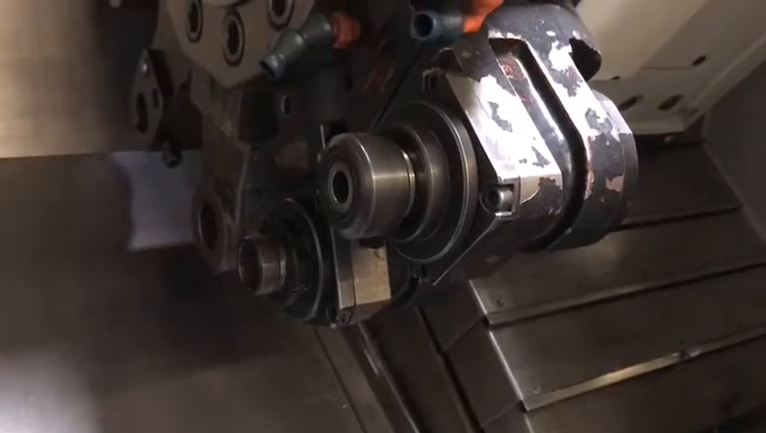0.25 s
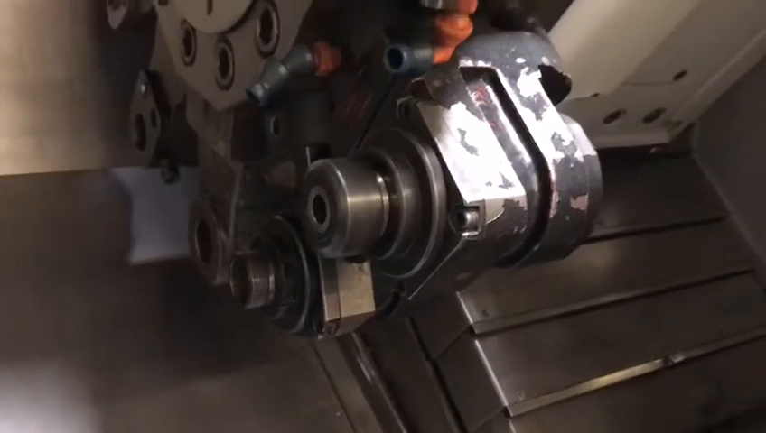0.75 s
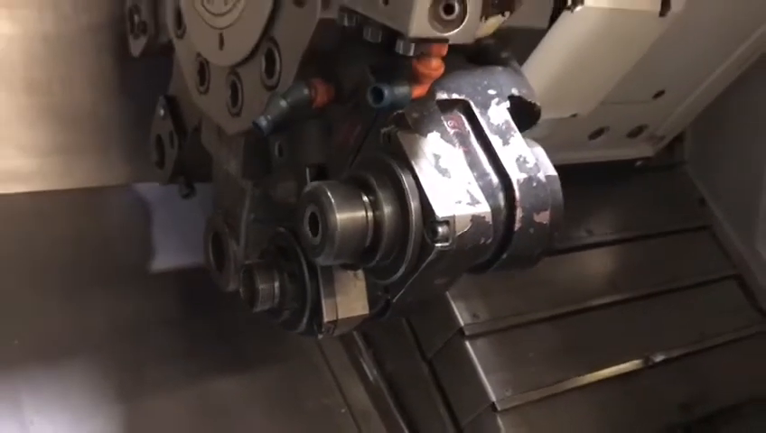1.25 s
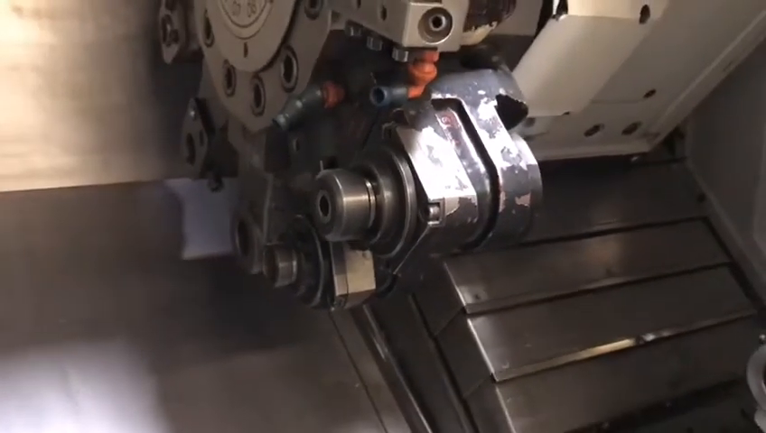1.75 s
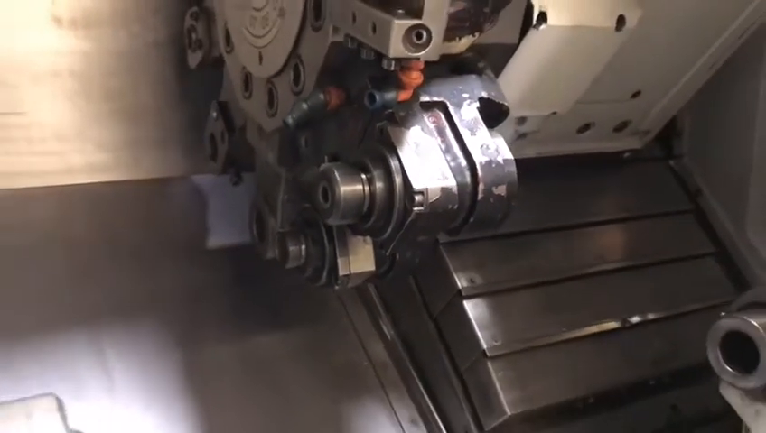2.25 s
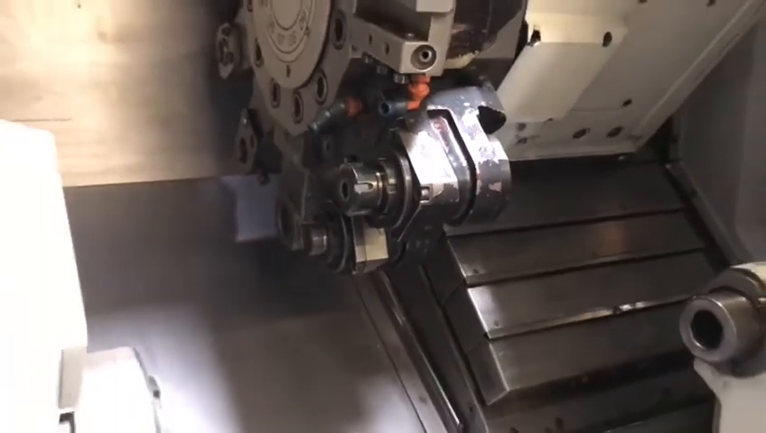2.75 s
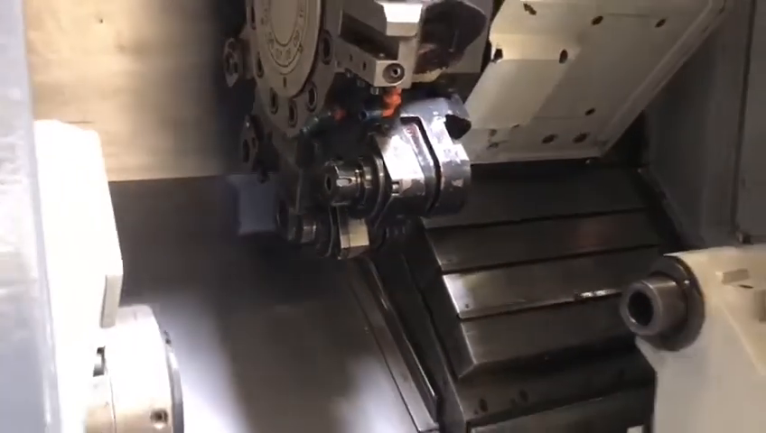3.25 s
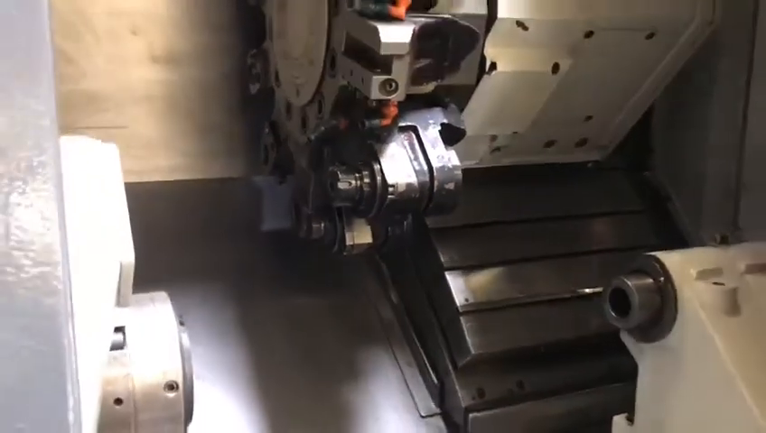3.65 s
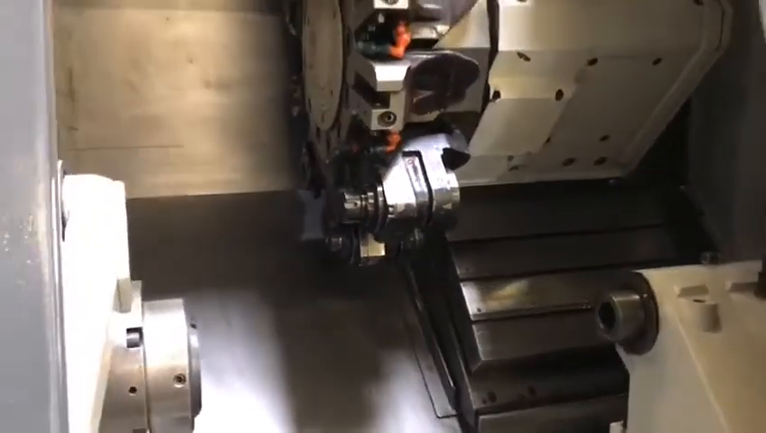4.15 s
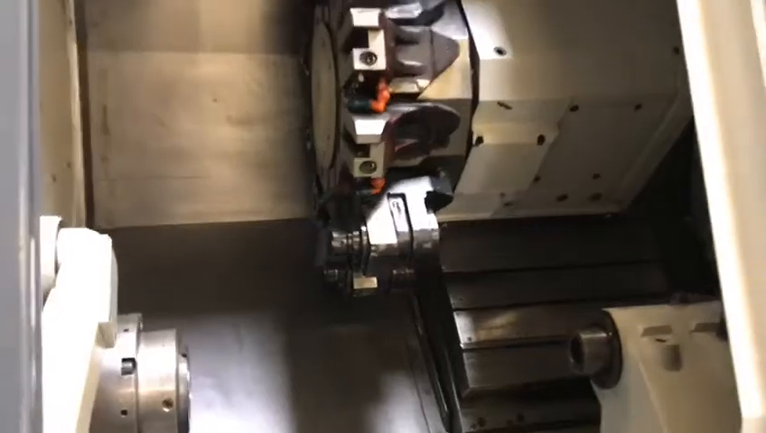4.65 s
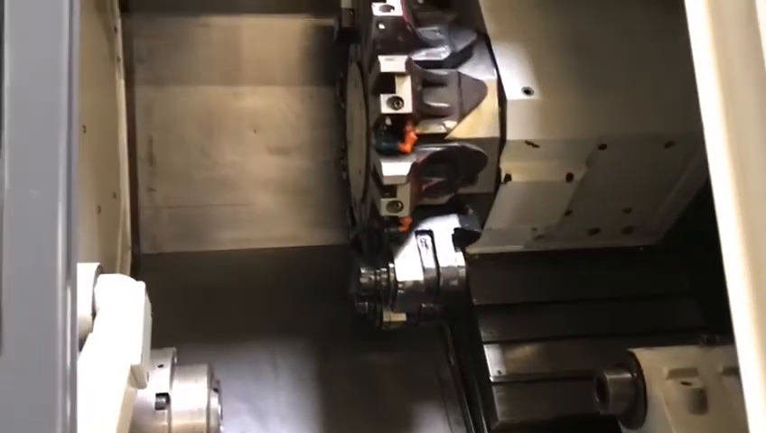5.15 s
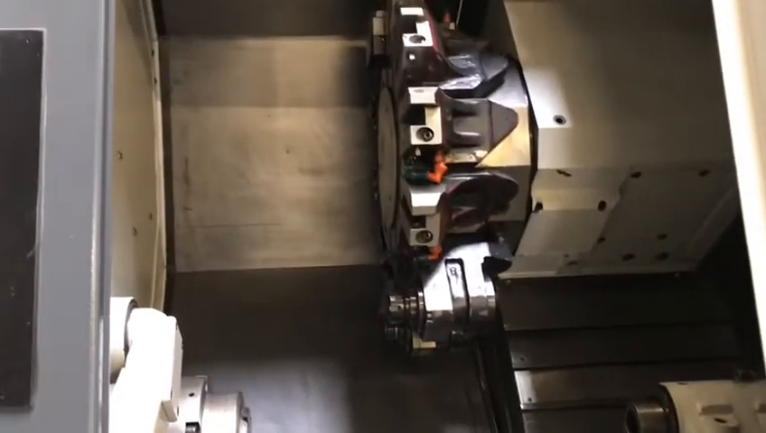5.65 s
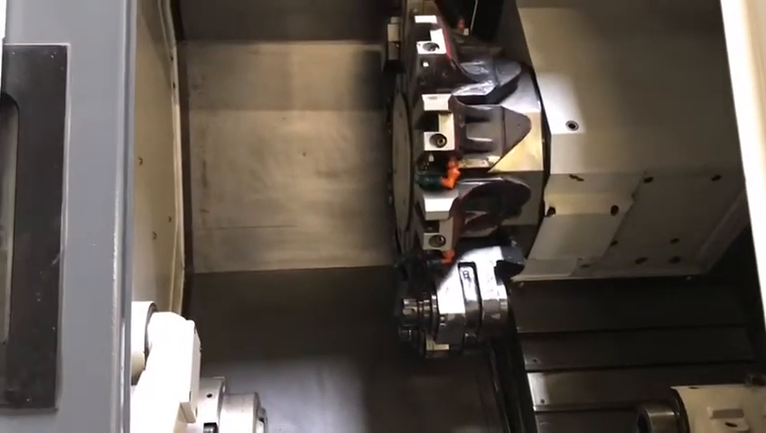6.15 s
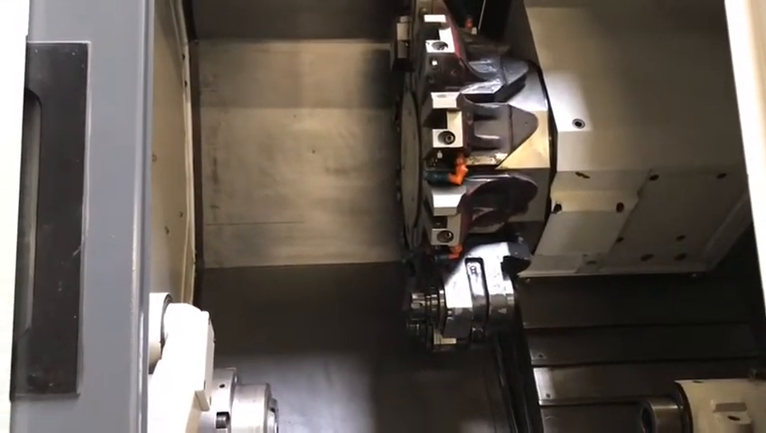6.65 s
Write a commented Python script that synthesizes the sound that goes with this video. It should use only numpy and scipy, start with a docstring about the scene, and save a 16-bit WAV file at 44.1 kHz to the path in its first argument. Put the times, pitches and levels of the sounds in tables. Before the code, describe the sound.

A rattling, whining gear-driven tool dominates for over two seconds, then slows fast and stops, overlapped by a surge of air hiss and a dull thump. Hydraulic pump tones, fans and drive whistles hum on in a workshop. The microphone withdraws from the metal enclosure; a double steel knock precedes the air cutting off, with one bright click, then a fainter one. High whines swell at the end.

```python
"""Inside a CNC lathe a geared live tool spins: tones and noise locked to its turns rattle and whine.
Compressed air starts to hiss as shaped noise; the tool brakes to a stop, a thump follows, the pump grows louder.
The microphone backs out of the steel enclosure to its door, past faint whistles and a double knock.
The air is shut off and two clicks, made of short dying tones, sound before and after the door is reached.
Tones for the pump, fans and servo drives hum throughout over a wash of noise; some high whines swell late."""
import sys
import numpy as np
from scipy import signal
from scipy.fft import rfft, irfft
from scipy.io import wavfile

SR = 44100
rng = np.random.default_rng(int(sys.argv[2]) if len(sys.argv) > 2 else 0)


def to_wav(s):
    """Save 16-bit WAV."""
    ch = np.atleast_2d(s).T  # columns
    pcm = np.round(np.clip(ch, -1, 1) * 32767)  # PCM
    wavfile.write(sys.argv[1], SR, pcm.astype(np.int16))


N = 304731
T = np.arange(N) / SR  # time in s
HZ = np.fft.rfftfreq(N, 1 / SR)

SHAFT_HZ = 32.64  # turns per second at full speed
BRAKE_S, STOP_S = 2.328, 2.535  # the tool shaft slows evenly to rest
RETREAT_S, RETREATED_S = 0.93, 1.17  # the microphone moves from close to the tool to further back
LEAVE_S, AT_DOOR_S = 3.27, 5.96  # then it backs out to the door
STANDING_S, STANDING_LENGTH_S = 4.07, 1.83  # middle and length of its way through a standing wave
LATE_SWELL_S, LATE_FULL_S = 6.35, 6.6  # some high whines swell late


def gain_of(db):
    """Turns decibels into a factor."""
    return 10 ** (np.asarray(db) / 20)


def evened(x):
    """Scales a sound to rms 1."""
    return x / np.sqrt(np.mean(x ** 2) + 1e-20)


def ramp(start_s, end_s):
    """Rises evenly from 0 to 1 between two times."""
    return np.clip((T - start_s) / (end_s - start_s), 0, 1)


def arch(middle_s, length_s):
    """Swells from 0 to 1 and back around a time."""
    return np.cos(np.pi * np.clip((T - middle_s) / length_s, -.5, .5))


def coloured(x, points):
    """Gives a sound the tone colour of a table of pitches and levels, at rms 1."""
    hz, db = np.transpose(points)
    level_db = np.interp(np.log(HZ + 1), np.log(hz), db)
    return evened(irfft(rfft(x) * gain_of(level_db), N))


def drift(rate_hz, count=2048):
    """Wanders by chance at about rms 1, with little movement faster than the rate."""
    f = np.fft.rfftfreq(count, N / SR / count)
    slow = irfft(rfft(rng.standard_normal(count)) / (1 + (f / rate_hz) ** 2))
    return np.interp(T, np.linspace(0, T[-1], count), evened(slow))


def tone(turns, unsteady, rate_hz):
    """A pure tone of rms about 1 whose strength and phase waver."""
    angle = 2 * np.pi * (turns + rng.random())
    share = np.clip(unsteady, 0, 1)
    steady = np.sqrt(2 * (1 - share ** 2))
    in_step = (steady + share * drift(rate_hz)) * np.cos(angle)
    return in_step + share * drift(rate_hz) * np.sin(angle)


def ringing(hz, width_hz):
    """Noise in one resonance, fixed or gliding, at rms 1."""
    r = np.exp(-np.pi * abs(width_hz) / SR)
    noise = rng.standard_normal(N) + 1j * rng.standard_normal(N)
    slow = signal.lfilter([1], [1, -2 * r, r * r], noise)
    # turning the slow noise moves it up to the wanted pitch
    carrier = np.exp(2j * np.pi * np.cumsum(hz * np.ones(N)) / SR)
    return evened((slow * carrier).real)


def shaft_share():
    """Shaft speed as a share of full speed, falling evenly to 0 under the brake."""
    return 1 - ramp(BRAKE_S, STOP_S)


def braking(bite_s=.025):
    """How firmly the brake holds the teeth against their other flanks, 0-1."""
    return ramp(BRAKE_S, BRAKE_S + bite_s)


def retreat(reach=0.84):
    """Share of the way from the close levels to those further back; it stops at the reach."""
    return reach * ramp(RETREAT_S, RETREATED_S)


def receding(first_db, back_db, fall_db_per_s):
    """Level in dB of a part of the tool as the microphone draws away."""
    return first_db + back_db * ramp(RETREAT_S, RETREATED_S) - fall_db_per_s * T


def loud_spot(hz, middle_s=.72, length_s=.8, centre_hz=925, width_hz=45, lift_db=3.2):
    """Lift in dB where tool tones near one pitch pile up as the microphone crosses a spot."""
    nearness = np.exp(-((hz - centre_hz) / width_hz) ** 2)
    return lift_db * arch(middle_s, length_s) * nearness


def gear_rattle(turns, repeat=0.43, smooth_hz=3800, pulsing=0.047, split_hz=1650,
                rattle_fade=1.05, rumble_fade=0.23, size=1351):
    """Tooth errors repeat on every turn, most strongly once a turn; rolling noise fills in between."""
    # colour of the gear rattle: pitch_hz, level_db (relative)
    housing_colour = [(25, -29), (60, -7), (130, -7.5), (185, -11), (280, -1.5), (420, 0), (900, -0.5),
                      (1100, -5), (1600, -9), (1850, -2), (2950, -3.5), (3550, -0.5), (4400, -4.5),
                      (5000, -8.5), (6300, -8.5), (8800, -11.8), (10200, -17.5), (10900, -10.5),
                      (11700, -26)]

    def per_turn(times):
        steps = size // times
        return np.interp(turns * times % 1, np.linspace(0, 1, steps), rng.standard_normal(steps))

    # smoothing leaves mostly the coarser errors to repeat
    smoothing = signal.butter(2, smooth_hz, fs=SR, output="sos")
    teeth = signal.sosfilt(smoothing, evened(1.36 * per_turn(1) + per_turn(2)))
    rolling = rng.standard_normal(N)
    # backlash loads and unloads the teeth within each turn
    pulses = sum(np.cos(2 * np.pi * (k * turns + rng.random())) / k ** 0.17 for k in range(1, 9))
    load = 1 + pulsing * evened(pulses)
    speed = shaft_share()
    casing = rfft(coloured(load * (repeat * speed * teeth + rolling), housing_colour))
    low = 1 / (1 + (HZ / split_hz) ** 8)
    # each: level at first (dB), change on moving back (dB), steady fall (dB per s)
    rattle_db = receding(-22.5, 0.24, 1.14)
    rumble_db = receding(-30, -1.2, 1.64)
    # under the brake the teeth knock against the casing, at -32.5 dB before the fade with speed
    rumble_db = rumble_db + braking() * (-32.5 - rumble_db)
    rattle = gain_of(rattle_db) * evened(irfft(casing * (1 - low), N))
    rumble = gain_of(rumble_db) * evened(irfft(casing * low, N))
    # the bright rattle dies first as the shaft slows
    return rattle * speed ** rattle_fade + rumble * speed ** rumble_fade


def gear_whine(turns, whine_db=-.5, fading=22, mesh_order=72):
    """Tones locked to the shaft; the main mesh is the steadiest, and all fade fast as the shaft slows."""
    # whines of gears and bearings: order (multiple of shaft speed), close_db, back_db (before whine_db)
    gear_orders = [(2, -47, -52), (4, -42.5, -48), (11.8, -43, -41), (12.05, -40.5, -39.5), (13, -46, -45),
                   (14, -44, -45), (15, -44, -56), (16, -47, -43), (17, -42, -48), (18.14, -34.5, -41),
                   (19, -42, -43), (24, -40, -52), (25, -41, -55), (26, -41, -51), (27, -41, -40),
                   (28, -39.5, -54), (29, -33, -34), (31, -37.5, -43), (36.83, -38, -41), (38, -35.5, -45),
                   (43, -47, -46), (46, -43, -54), (48, -44, -56), (52, -41, -56), (54, -35.5, -50),
                   (60, -39, -55), (68, -42, -47), (70, -41, -40), (74, -49, -40), (84, -44, -41),
                   (96, -42, -42), (99, -48, -42), (112, -41, -45), (174, -46, -59), (236.35, -44.5, -49)]
    back = retreat()
    # main mesh: level at first (dB), change on moving back (dB), steady fall (dB per s)
    mesh_db = receding(-27, 9.5, 3.5)
    out = gain_of(mesh_db) * tone(mesh_order * turns, 0.09, rate_hz=16)
    for order, close_db, back_db in gear_orders:
        level_db = whine_db + close_db + back * (back_db - close_db) + loud_spot(order * SHAFT_HZ)
        out += gain_of(level_db) * tone(order * turns, 0.43, rate_hz=9.6)
    return shaft_share() ** fading * out


def casing_ring(dying_hz=2600):
    """The casing rings at its own pitches; braking knocks the teeth about, and high modes go quiet first."""
    # resonances of the tool casing: pitch_hz, width_hz, close_db, back_db, brake_db
    casing_modes = [(540, 70, -54, -43, -35.5), (790, 60, -39.5, -56, -49), (915, 80, -36, -47, -52),
                    (1370, 170, -37.5, -40, -37.5), (1850, 60, -38.5, -44, -43),
                    (2350, 110, -44, -41, -33.5), (2750, 110, -41, -39.5, -33.5),
                    (3220, 130, -41, -37, -36), (3424, 76, -34, -38, -43), (3660, 90, -36.5, -35, -34)]
    back, speed, brake = retreat(), shaft_share(), braking()
    out = np.zeros(N)
    for hz, width_hz, close_db, back_db, brake_db in casing_modes:
        running_db = close_db + back * (back_db - close_db) + loud_spot(hz)
        level_db = running_db + brake * (brake_db - running_db)
        out += gain_of(level_db) * speed ** (hz / dying_hz) * ringing(hz, width_hz)
    return out


def passing_dip(x, middle_s=3.98, length_s=.9, centre_hz=3250, glide_hz_per_s=650, width_hz=400, depth=.45):
    """A wall echo partly cancels a band that rises as the microphone moves."""
    turn = np.exp(2j * np.pi * np.cumsum(centre_hz + glide_hz_per_s * (T - middle_s)) / SR)
    r = np.exp(-np.pi * width_hz / SR)
    # shift the band down to 0 Hz, keep what is slow, and shift it back up
    band = 2 * (turn * signal.lfilter([1 - r], [1, -r], x / turn)).real
    return x - depth * arch(middle_s, length_s) * band


def air_jet(flutter_db=0.34, echo=0.18, shift_ms=.2, count=7):
    """Turbulent hiss, rippled by wall echoes of wandering delay; it surges, settles and is shut off."""
    # colour of the air jet: pitch_hz, level_db (relative)
    jet_colour = [(200, -14), (430, -10), (540, -2.5), (660, -8), (1000, -4), (1550, -6.5), (1850, -3.5),
                  (2600, -2), (4400, 0.5), (4900, -3.5), (7000, -6.5), (7700, -11.5), (8700, -7.5),
                  (10200, -13.5), (11000, -12), (11700, -16)]
    # resonances of the enclosure, relative to the hiss: pitch_hz, width_hz, inside_db, door_db
    enclosure_modes = [(998, 64, -21, -19), (1800, 80, -21, -17), (2100, 70, -16.5, -30),
                       (2414, 90, -16, -25), (2680, 220, -20, -11), (3800, 500, -17, -11),
                       (4480, 260, -22, -12), (5770, 300, -28, -12), (6170, 240, -17, -30),
                       (7060, 200, -29, -14)]
    open_s, attack_s, shut_s, t60_s = 2.3, .14, 5.497, 0.21
    jet_db, surge_db, settle_s = -35, 4.5, 0.88
    direct = rng.standard_normal(N)
    heard = direct.copy()
    for delay_ms in rng.uniform(1.5, 9, count):
        lag = (delay_ms + shift_ms * drift(.1)) * SR / 1000  # in samples
        heard += echo * np.interp(np.arange(N) - lag, np.arange(N), direct)
    hiss = coloured(heard, jet_colour)
    door = ramp(LEAVE_S, AT_DOOR_S)
    for hz, width_hz, inside_db, door_db in enclosure_modes:
        hiss += gain_of(inside_db + door * (door_db - inside_db)) * ringing(hz, width_hz)
    # the jet settles as the line pressure sags
    surge = np.exp(-np.maximum(T - open_s - attack_s, 0) / settle_s)
    closing = np.exp(-np.log(1000) * np.maximum(T - shut_s, 0) / t60_s)
    valve = ramp(open_s, open_s + attack_s) * closing
    level_db = jet_db + surge_db * surge + flutter_db * drift(23)
    return valve * gain_of(level_db) * passing_dip(hiss)


def whistles():
    """Narrow bands of noise whistle faintly in the hiss; they swell and fade, and some glide."""
    # fuzzy whistles: middle_s, length_s, pitch_hz, glide_hz_per_s, width_hz, level_db
    whistle_list = [(3.92, .36, 3470, 380, 30, -48), (4.14, .38, 3625, 160, 35, -44),
                    (4.12, .6, 4000, 0, 35, -47.5), (3.65, 1.1, 2735, -70, 40, -47.5)]
    out = np.zeros(N)
    for middle_s, length_s, hz, glide, width_hz, db in whistle_list:
        pitch_hz = hz + glide * (T - middle_s)
        out += gain_of(db) * arch(middle_s, length_s) * ringing(pitch_hz, width_hz)
    return out


def blow(s, db, modes, scatter=0.28, scatter_s=.012):
    """One blow rings heavily damped modes; the steel walls scatter a little of it back."""
    out, t = np.zeros(N), np.arange(SR // 4) / SR
    ring = np.zeros(len(t))
    for hz, mode_db, t60_s in modes:
        ring += gain_of(mode_db) * np.sin(2 * np.pi * hz * t) * np.exp(-np.log(1000) * t / t60_s)
    fading_noise = rng.standard_normal(len(t)) * np.exp(-t / scatter_s)
    echoes = signal.fftconvolve(ring, fading_noise)[:len(t)]
    struck = ring + scatter * np.std(ring) * evened(echoes)
    part = out[round(s * SR):][:len(t)]  # a view: adding here fills out
    part += gain_of(db) * struck[:len(part)]
    return out


def knocks():
    """Blows set solid parts ringing: a thump once the shaft locks, a double knock on steel and sharp clicks."""
    # when and how strong: start_s, level_db (the modes' levels come on top)
    thump_time = (2.615, -30)
    knock_times = [(4.9637, -23), (4.9705, -28)]
    click_times = [(5.583, -20.5), (5.9995, -34)]
    # what each rings with: pitch_hz, level_db (relative), t60_s (time to fall by 60 dB)
    thump_rings = [(80, -1, .1), (180, -4, .05)]
    knock_rings = [(130, -17, .035), (330, -9, 0.028), (540, -7, .024), (800, -9, .016), (1100, -3, 0.015),
                   (1380, -5, .012), (2200, -7, .007), (3250, 1.5, 0.008)]
    click_rings = [(900, -18, .004), (1700, -9, .005), (2800, -8, .004), (3900, -1, 0.0037),
                   (6950, -3.5, .004), (8400, -9, .003), (11000, -5.5, .003)]
    thump = blow(*thump_time, thump_rings, scatter=.28)
    steel = sum(blow(s, db, knock_rings, scatter=.39) for s, db in knock_times)
    clicks = sum(blow(s, db, click_rings, scatter=.25) for s, db in click_times)
    return thump + steel + clicks


def pump(stroke_hz=384.85, pump_db=-51, idle_db=-5.5, swell_order=9, swell_db=5):
    """Piston strokes give a row of tones, louder once the shaft has stopped; the enclosure shapes the lowest."""
    # piston ripple: multiple (of the stroke rate), level_db (relative)
    piston_tones = [(1, -9.5), (2, 2.5), (3, -3.5), (4, -4), (5, -9), (6, -1.7), (7, -3), (8, -14), (9, -6),
                    (10, -11), (11, -26), (12, -13), (13, -41), (14, -18), (15, -20), (16, -12.5),
                    (17, -21), (18, -20), (19, -25), (20, -28), (21, -31), (22, -23), (23, -24), (24, -27),
                    (25, -39), (26, -31)]
    # the enclosure's effect on the lowest tones: multiple, inside_db, door_db, standing_db (all added)
    cavity_table = [(1, 16, -7, 0), (2, -4, -7, 7), (3, -0.5, -1, 1), (4, 5, -7.5, 5), (5, 0.5, 0, 0)]
    door, standing = ramp(LEAVE_S, AT_DOOR_S), arch(STANDING_S, STANDING_LENGTH_S)
    strokes = np.cumsum(stroke_hz * (1 + 0.000383 * drift(1.9))) / SR
    load_db = idle_db * (1 - ramp(2.62, 2.64))
    late = ramp(LATE_SWELL_S, LATE_FULL_S)
    multiples, *cavity = np.transpose(cavity_table)
    out = np.zeros(N)
    for k, db in piston_tones:
        # above the last multiple listed, its values hold on
        inside_db, door_db, standing_db = (np.interp(k, multiples, column) for column in cavity)
        cavity_db = inside_db + door * (door_db - inside_db) + standing * standing_db
        cavity_db += swell_db * late * (k == swell_order)
        out += gain_of(pump_db + db + load_db + cavity_db) * tone(k * strokes, 0.3, rate_hz=3.6)
    return out


def fans(node_hz=821.5, node_db=-10):
    """Fans and mains hum at fixed pitches; one tone sinks where the standing wave has a node."""
    # pitches of the fans and mains hum: pitch_hz
    fan_pitches = [100, 119, 229, 258.6, 409, 694, 776, 821.5, 1157, 1218, 1391]
    # a row for each pitch: inside_db, door_db, unsteadiness (0-1)
    fan_levels = [(-57.5, -61, 0.92), (-53.5, -55, 0.12), (-52.5, -54, 0.99), (-45.5, -45, 0.33),
                  (-48.5, -56.5, 0.31), (-87, -65, .4), (-56, -58.5, 0.3), (-45, -49.5, 0.2),
                  (-64, -61, .2), (-56.5, -66, 0.35), (-56, -58.5, 0.7)]
    door, standing = ramp(LEAVE_S, AT_DOOR_S), arch(STANDING_S, STANDING_LENGTH_S)
    out = np.zeros(N)
    for hz, (inside_db, door_db, unsteady) in zip(fan_pitches, fan_levels):
        level_db = inside_db + door * (door_db - inside_db) + node_db * standing * (hz == node_hz)
        out += gain_of(level_db) * tone(hz * T, unsteady, rate_hz=8.6)
    return out


def servo_drives(base_hz=1111.2, inside_db=-8, swell_db=4.5, swell_order=3):
    """The drives whistle at multiples of one pitch, softer inside; from the swell order up they swell late."""
    # whistle of the drives: multiple (of the base pitch), level_db (at the door, before the swell)
    drive_tones = [(2, -62.5), (3, -56.5), (4, -70), (5, -70), (6, -77), (7.18, -75), (8, -79), (9, -85)]
    door, late = ramp(LEAVE_S, AT_DOOR_S), ramp(LATE_SWELL_S, LATE_FULL_S)
    out = np.zeros(N)
    for k, db in drive_tones:
        change_db = inside_db * (1 - door) + swell_db * late * (k >= swell_order)
        out += gain_of(db + change_db) * tone(k * base_hz * T, 0.2, rate_hz=5)
    return out


def workshop(shop_db=-46, swell_db=0.14):
    """Ventilation and distant machines blur into an even wash of noise."""
    # colour of the workshop's wash: pitch_hz, level_db (relative)
    shop_colour = [(20, -23), (50, 4), (110, 1.5), (230, 0), (480, -1), (1200, -1.5), (1750, -6.5),
                   (3400, -10.5), (4900, -14.5), (6800, -14.5), (7600, -21.5), (11000, -18.5), (11700, -21)]
    return gain_of(shop_db + swell_db * drift(3.4)) * coloured(rng.standard_normal(N), shop_colour)


def scene():
    """All sources add up at one microphone, heard alike in both ears."""
    turns = np.cumsum(SHAFT_HZ * shaft_share()) / SR  # shaft turns so far
    tool = gear_rattle(turns) + gear_whine(turns) + casing_ring()
    air = air_jet() + whistles()
    background = pump() + fans() + servo_drives() + workshop()
    mono = tool + air + knocks() + background
    return np.array([mono, mono])


def record(dry):
    """A low cut at 35 Hz against handling rumble, then a steep limit on the treble."""
    low_cut = signal.butter(2, 35, "high", fs=SR, output="sos")
    cut = signal.sosfilt(low_cut, dry)
    treble_limit = signal.firwin(511, 11800, window=("kaiser", 9), fs=SR)  # edge in Hz
    return signal.oaconvolve(cut, treble_limit[None], "same")


dry = scene()
out = record(dry)
to_wav(out)
```